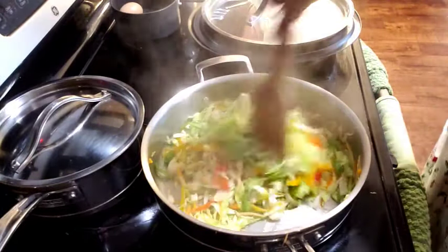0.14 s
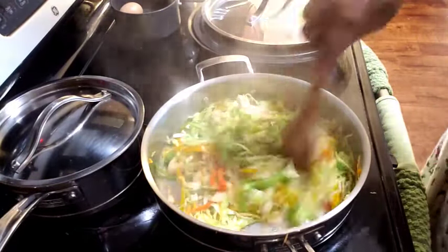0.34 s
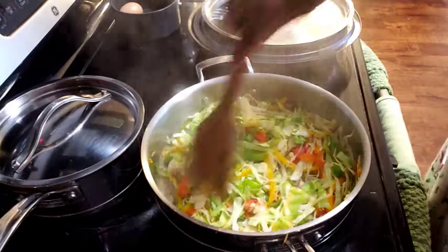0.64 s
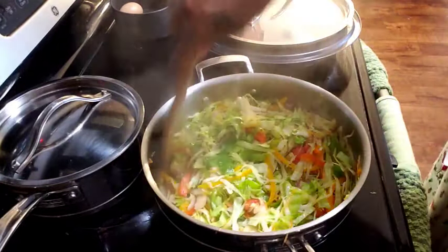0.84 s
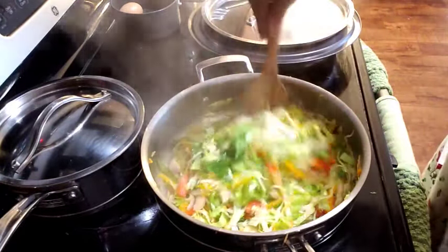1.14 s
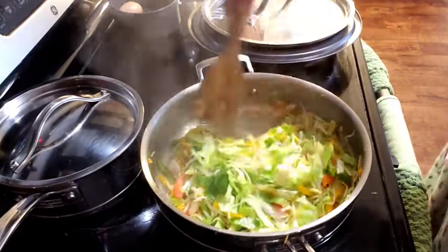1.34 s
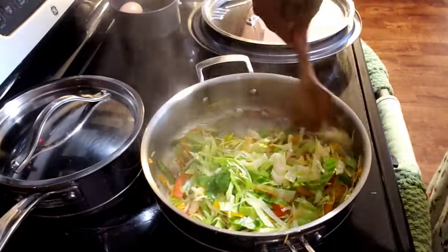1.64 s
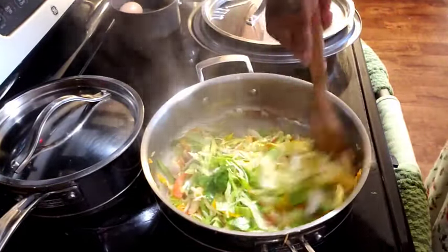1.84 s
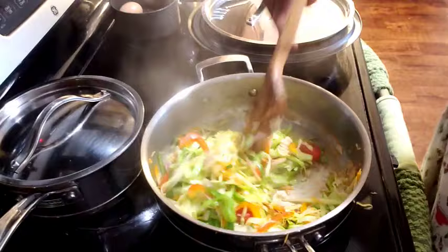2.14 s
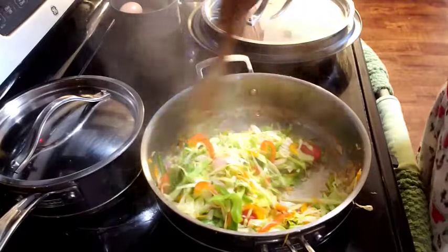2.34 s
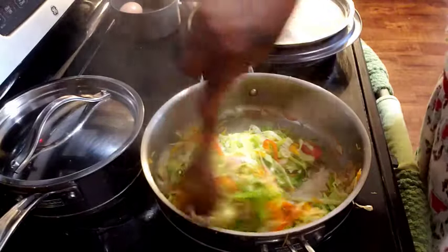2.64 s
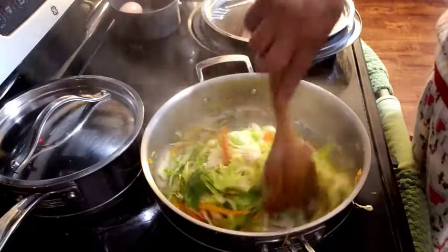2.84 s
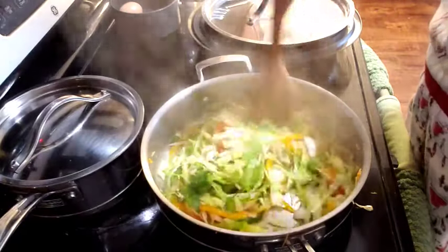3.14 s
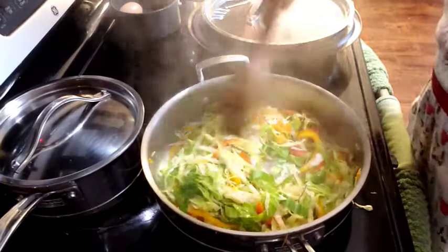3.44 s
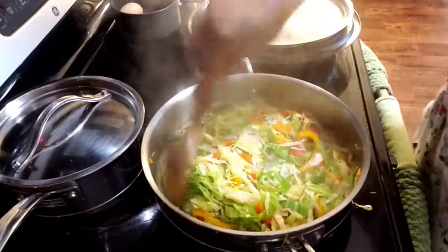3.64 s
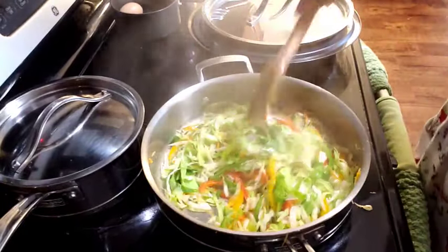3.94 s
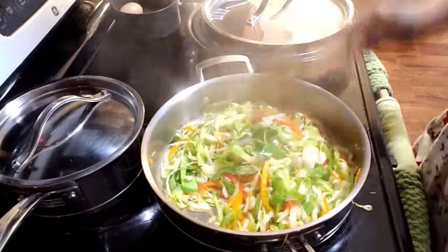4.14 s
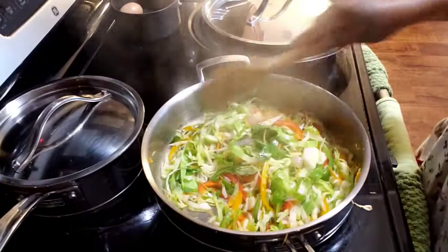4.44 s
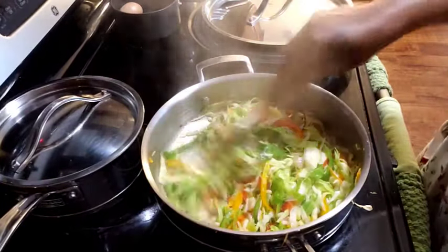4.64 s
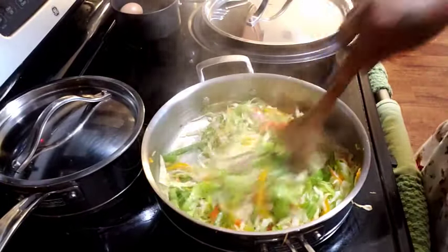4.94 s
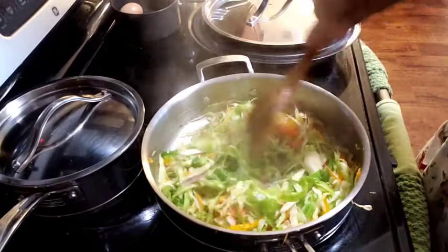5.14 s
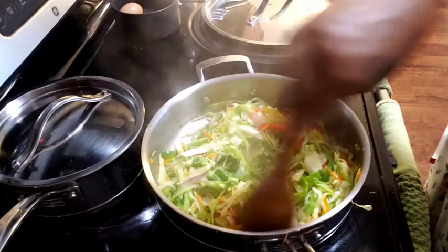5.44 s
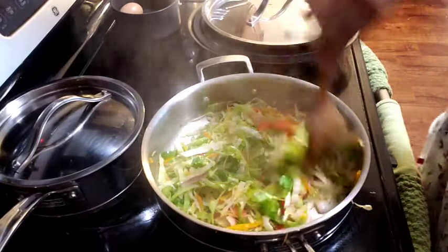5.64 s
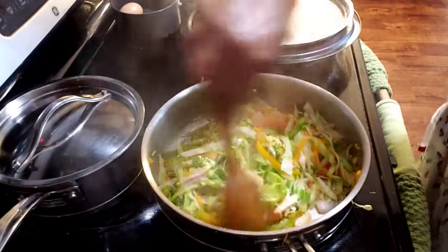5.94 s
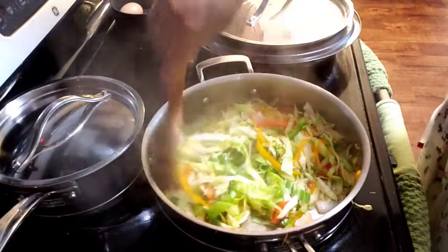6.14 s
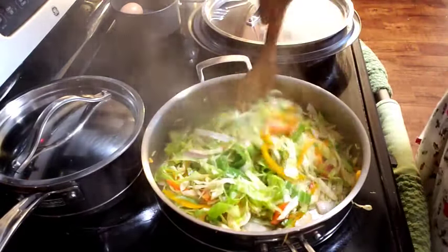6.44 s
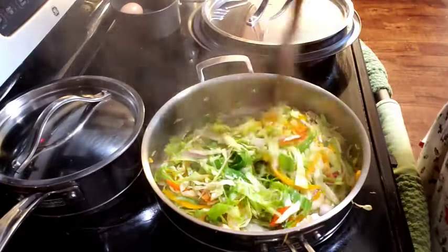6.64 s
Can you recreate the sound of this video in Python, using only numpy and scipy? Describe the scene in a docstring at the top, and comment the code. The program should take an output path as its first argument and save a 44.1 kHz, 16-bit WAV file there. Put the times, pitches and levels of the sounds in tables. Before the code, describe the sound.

Shredded vegetables sizzle softly in a steel pan while a kitchen hood fan rushes and hums steadily for about seven seconds. A wooden spoon stirs throughout, each stroke raising a moist rustle and a swell of hiss, with occasional little spits. A short scrape and dull bumps of the pan on the cooktop come at about 0.4 seconds. The spoon knocks the pan at 0.8 and 1 second, then harder at 1.5, each blow ringing briefly in the room. Soft bumps follow around 2.5 and 3.3 seconds, and a light knock at 3.7. The loudest sound is a hard, ringing rap on the rim at 4.3 seconds, followed by a duller thud at 4.6; the overall level dips slightly after the rap. Another short scrape comes at 5 seconds, then knocks at 5.5 and 5.9 and two lighter ones around 6.3, as the stirring and sizzling continue.

```python
"""Stir-frying under a hood fan

A wooden spoon stirs shredded vegetables in a steel pan on a glass cooktop while the fan rushes and hums. Steam
sizzles, shreds rustle, and the spoon scrapes and knocks the wall and raps hard on the rim; pan, spoon, cooktop
and kitchen ring. An automatic gain ducks at the loudest blow and creeps back."""
import sys
import numpy as np
from scipy import signal
from scipy.fft import rfft, irfft
from scipy.io import wavfile
from scipy.ndimage import uniform_filter1d

SR = 44100
rng = np.random.default_rng(int(sys.argv[2]) if len(sys.argv) > 2 else 0)


def dump(signal):
    """Clip the signal to [-1, 1] and save it as 16-bit WAV at the path in sys.argv[1]."""
    limited = np.clip(np.atleast_2d(signal).T, -1, 1)
    pcm = np.round(limited * 32767).astype(np.int16)
    wavfile.write(sys.argv[1], SR, pcm)


N = 299241

# how alike left and right are: frequency_hz, likeness (0-1)
STEREO_LIKENESS = [(130, 1), (300, 0.97), (640, .6), (1400, 0), (3000, 0)]
# tone of the pan's clusters of short-lived modes: frequency_hz, level_db
MODE_CLUSTERS = [(450, -1.5), (600, 0), (730, -5), (850, 3), (1000, -3), (1480, 1), (1750, 1.5),
                 (2000, 0.5), (2280, 1), (2600, 6), (3900, -2), (5700, -3), (8500, -4.5), (15000, -6)]


def undb(db):
    """Decibels to gain."""
    return 10 ** (np.asarray(db) / 20)


def lookup(table, hz):
    """Read (hz, value) points on a log-frequency axis."""
    points, values = np.transpose(table)
    return np.interp(np.log(np.maximum(hz, 1)), np.log(points), values)


def bins(x):
    """Frequencies of the spectrum of x."""
    return np.fft.rfftfreq(x.shape[-1], 1 / SR)


def colour(x, spectrum):
    """Equalise x by (hz, db) points."""
    return irfft(rfft(x) * undb(lookup(spectrum, bins(x))), x.shape[-1])


def cut(x, hz, kind, order):
    """Causal low- or high-pass."""
    return signal.sosfilt(signal.butter(order, min(hz, SR / 2 - 1000), kind, fs=SR, output="sos"), x)


def unit(x):
    """Scale to rms 1."""
    return x / np.sqrt(np.mean(x ** 2))


def add(out, start_s, sound):
    """Mix a sound in at its time."""
    start = int(start_s * SR)
    out[:, start:start + sound.shape[1]] += sound


def wander(rate_hz):
    """Smooth random drift of rms 1."""
    hold = int(SR / rate_hz)
    steps = np.repeat(rng.standard_normal(N // hold + 1), hold)
    return unit(uniform_filter1d(steps, hold)[:N])


def decay(t, t60_s):
    """Exponential decay of unit energy."""
    shape = np.exp(-np.log(1000) * t / t60_s)
    return shape / np.sqrt(np.sum(shape ** 2))


def swell(middle_s, half_s):
    """Bell-shaped rise and fall around a moment."""
    return np.exp(-((np.arange(N) / SR - middle_s) / half_s) ** 2)


def diffuse(size):
    """Stereo white noise: alike in the bass, unrelated in the treble."""
    noise = rng.standard_normal((2, size))
    mid, side = rfft(noise)
    likeness = np.clip(lookup(STEREO_LIKENESS, bins(noise)), 0, 1)
    mid, side = mid * np.sqrt((1 + likeness) / 2), side * np.sqrt((1 - likeness) / 2)
    return irfft(np.array([mid + side, mid - side]), size)


def crackle(per_s, spread_db):
    """Tiny random clicks, a few much larger than the rest."""
    sizes = undb(spread_db * np.minimum(rng.exponential(size=(2, N)), 5))
    clicks = rng.random((2, N)) < per_s / SR
    return unit(clicks * sizes * rng.choice([-1, 1], (2, N)))


def ring(t, modes):
    """Struck (pitch_hz, resonance_db, t60_s) modes; the high ones reach left and right out of step."""
    out = np.zeros((2, len(t)))
    for k, (hz, db, t60_s) in enumerate(modes):
        skew = (-1) ** k * np.arccos(np.clip(lookup(STEREO_LIKENESS, hz), 0, 1)) / 2
        damping = np.log(1000) / t60_s
        polarity = (-1) ** (k // 2)  # some modes start towards the listener, others away
        tone = np.cos(2 * np.pi * hz * t + np.array([[skew], [-skew]]))
        out += polarity * undb(db) * 2 * damping / SR * np.exp(-damping * t) * tone
    return out


def hood_fan(air_db=-54.5):
    """The fan's rush of air over its slightly wavering motor hum."""
    # tone of the moving air: frequency_hz, level_db
    air_spectrum = [(25, -36), (42, -13.5), (55, 0.5), (72, -8), (110, -4), (170, 2.5), (300, -2.5),
                    (500, -2), (620, -15), (850, -12), (1200, -25), (4000, -31.5)]
    # motor partials: pitch_hz, level_db
    partials = [(42, -60.5), (119, -57.5), (377, -75)]
    t = np.arange(N) / SR
    hum = sum(undb(db) * np.sin(2 * np.pi * hz * t + 0.36 * wander(3.5)) for hz, db in partials)
    return undb(air_db) * unit(colour(diffuse(N), air_spectrum)) + hum


def frying_food(simmer_db=-61.3, heating_db_per_s=.98, settling_db=-64.5, pops_db=-6,
                sizzle_trim_db=9, rustle_trim_db=-1, spit_half_s=.02):
    """Steam bubbles burst on hot steel; pushed shreds rub and snap. Both swell with each stroke."""
    # tone of the bursting bubbles: frequency_hz, level_db
    sizzle_spectrum = [(600, -2.5), (1300, -11), (1650, -7.5), (2500, -9), (4300, -5), (8000, -2),
                       (15000, 4.5)]
    # tone of the rubbing shreds: frequency_hz, level_db
    rustle_spectrum = [(300, 7.5), (850, -1), (1200, -1.5), (1600, 2.5), (2500, -0.5), (4500, -1),
                       (8000, -24), (15000, -11.5)]
    # spoon strokes through the food, before trim: middle_s, half_length_s, rustle_db, sizzle_db
    strokes = [(0.42, .4, -55, -58.5), (1.08, .18, -52.5, -52), (1.85, .3, -56, -63),
               (2.62, .25, -56.5, -58), (3.01, .11, -52, -66), (3.28, .05, -50, -55.5),
               (3.96, .2, -56, -60.5), (4.95, .22, -54.5, -67), (5.65, .2, -59.5, -57.5),
               (6.62, .3, -51.5, -54.5)]
    # wet shreds spit when squeezed onto the steel, before trim: middle_s, level_db
    spits = [(.425, -53.5), (.868, -46), (2.57, -57), (3.706, -47.5), (4.65, -55)]
    simmer = undb(simmer_db + heating_db_per_s * np.arange(N) / SR)
    stir_power = sum(undb(db) ** 2 * swell(s, half_s) for s, half_s, _, db in strokes)
    spit_power = sum(undb(db) ** 2 * swell(s, spit_half_s) for s, db in spits)
    rub_power = sum(undb(db) ** 2 * swell(s, half_s) for s, half_s, db, _ in strokes)
    steam = np.sqrt(simmer ** 2 + stir_power + spit_power)
    motion = np.sqrt(undb(settling_db) ** 2 + rub_power)
    sizzle = unit(colour(diffuse(N) + undb(pops_db) * crackle(per_s=720, spread_db=4), sizzle_spectrum))
    rustle = unit(colour(diffuse(N) + crackle(per_s=2000, spread_db=1), rustle_spectrum))
    waver_db, flutter_db = .5 * wander(40), .8 * wander(60)
    return (sizzle * steam * undb(sizzle_trim_db + waver_db)
            + rustle * motion * undb(rustle_trim_db + flutter_db))


def spoon_scrapes(squeak_hz=860, upper_hz=2300):
    """Dense slips of wood on steel ring two damped resonances, swelling and fading with each drag."""
    # drags over the pan wall: middle_s, half_length_s, level_db
    drags = [(0.422, 0.037, -55), (5.039, 0.049, -53.5)]
    t = np.arange(SR // 4) / SR
    body = ring(t, [(squeak_hz, 0, .031), (upper_hz, -5, .02)])
    slips = unit(signal.fftconvolve(crackle(per_s=1000, spread_db=2), body, axes=1)[:, :N])
    return slips * sum(undb(db) * swell(s, half_s) for s, half_s, db in drags)


def kitchen_reverb(t, build_s=0.0022):
    """Pan-coloured room tail of unit energy that builds quickly and dies sooner in the treble."""
    # the kitchen's decay times: frequency_hz, t60_s
    decay_times = [(250, 0.84), (1000, 0.62), (4000, 0.62), (14000, 0.58)]
    hz, s, grid = signal.stft(colour(diffuse(len(t)), MODE_CLUSTERS), SR, nperseg=256)
    absorption = np.exp(-np.log(1000) * s / lookup(decay_times, hz)[:, None])
    tail = signal.istft(grid * absorption, SR)[1][:, :len(t)]
    onset = 1 - np.exp(-(t / build_s) ** 2)
    return unit(tail * onset) / np.sqrt(len(t))


def pan_rings(t, split_hz=450):
    """The steel floor rings low, the wall high; each as a pair: struck at the floor, struck at the rim."""
    # pan modes: pitch_hz, t60_s, floor_hit_db, rim_hit_db
    modes = [(213.5, .25, 3.5, 4.5), (258.2, 0.24, -17, 7), (299.5, 0.19, -13.5, -4),
             (345, 0.11, -4, -15.5), (380, .25, -5, -3.5), (504.6, 0.7, 10, 3), (527, .5, 12, 3.5),
             (574, 0.55, 8.5, -3), (657.6, 0.23, 5, 7.5), (870, 0.4, -10, 1.5), (922, 0.3, 5, -1),
             (915, 0.64, 0, -8), (1120, 0.56, 3.5, 6), (1358, .3, -4, 8), (1491, 0.512, 8, 7),
             (1525, .85, 2, 17), (1844, 0.23, 7.5, -2.5), (2023, .38, 5, 4), (2450, 0.38, 11, 6.5),
             (2530, 0.68, 7.5, 17), (2700, .42, -6.5, -3), (3230, 0.37, 5.5, 6), (4800, .55, -2, -3),
             (5520, .5, 3.5, -6)]
    floor_modes = [mode for mode in modes if mode[0] < split_hz]
    wall_modes = [mode for mode in modes if mode[0] >= split_hz]
    return [(ring(t, [(hz, db, t60_s) for hz, t60_s, db, _ in part]),
             ring(t, [(hz, db, t60_s) for hz, t60_s, _, db in part]))
            for part in (floor_modes, wall_modes)]


def pan_clatter(t, crack_db=-7, body_db=-4):
    """The contact's crack and the pan's crowd of short-lived modes, new at every blow."""
    envelope = undb(crack_db) * decay(t, t60_s=.012) + undb(body_db) * decay(t, t60_s=.11)
    return colour(diffuse(len(t)), MODE_CLUSTERS) * envelope


def pan_strike(t, bodies, cooktop_db, height, floor_db, wall_db, lower_hz, upper_hz, clack_db,
               room_db=-9.5, clack_room_db=-12, clack_t60_s=.08, snap_db=-10, bloom_s=.0045):
    """Bright and deep ringing of the pan after one contact."""
    room, cooktop, floor, wall = bodies
    # the height of the blow decides which modes wake
    floor_ring, wall_ring = ((1 - height) * low + height * rim for low, rim in (floor, wall))
    # spoon and pan in contact have two quickly damped resonances, set by grip and place
    clack = undb(clack_db) * ring(t, [(lower_hz, 0, clack_t60_s), (upper_hz, -1, clack_t60_s)])
    clack += undb(clack_room_db) * signal.fftconvolve(clack, room, axes=1)[:, :len(t)]
    snap = undb(snap_db) * cut(1. * (t == 0), 6000, "low", order=2)
    splash = cut(snap + pan_clatter(t) + undb(room_db) * room, 280, "high", order=2)
    bright = splash + undb(wall_db) * wall_ring + clack
    # the heavy pan floor and the glass under it take a moment to get going
    bloom = 1 - np.exp(-t / bloom_s)
    deep = (undb(cooktop_db) * cooktop + undb(floor_db) * floor_ring) * bloom
    return bright, deep


def spoon_knocks(low_cut_hz=58):
    """A blow is a soft push, cushioned by food, plus a tick of bare wood on steel; a bump only pushes."""
    # spoon blows: start_s, push_db, contact_cutoff_hz, tick_db, height (0 floor, 1 rim), cooktop_db,
    # floor_db, wall_db, lower_clack_hz, upper_clack_hz, clack_db, rebound_after_s (0 for none)
    blows = [ (.826, 5.5, 6800, 9, .76, 3, 14, -4, 605, 1340, 8, 0),
             (1.028, 10.5, 1850, -12, .39, 10, 10, -8, 833, 1700, 2, .012),
             (1.505, 12, 2200, 8, .09, 1, 17, 6, 876, 2020, 16.5, 0),
             (1.506, 1.5, 1600, -19, .56, -6, 10, -2, 606, 1480, 20.5, 0),
             (3.685, -.5, 810, -10, .3, -4, 11, 1, 640, 3020, 9, 0),
             (4.261, 26.5, 1850, 12, .8, 17.5, 15, 4, 500, 1500, 2, 0),
             (4.2693, 19.5, 2900, 15, .23, 18, 18, 1.5, 296, 689, 15.5, 0),
             (4.592, 15, 1436, -4, 0, 14, 0, -15, 160, 400, 12, 0),
             (5.4556, 1, 3900, -6, .7, -8, 16, -13, 595, 2020, 17, .0107),
             (5.908, 7, 7560, 9, 0, -1, 23.5, 4, 345, 2474, 13, 0),
             (6.295, -6, 1710, -17.5, .5, 14, 2, 3, 780, 1562, 6, 0),
             (6.388, 7.7, 1780, -11, .95, -14, 4, -6, 866, 1500, 5.5, .015), ]
    # the shoved pan bumps on the cooktop: start_s, push_db, contact_cutoff_hz, cooktop_db
    bumps = [(.393, -11, 1120, 23.5), (.428, -4.5, 1020, 22), (.866, -2, 900, 17), (.963, -3, 885, 16),
             (1.120, 6.5, 514, 15), (1.600, -5, 400, 20), (2.551, -4.5, 480, 22), (3.277, -17, 448, 30)]
    # voicing of every bump: height (0-1), floor_db, wall_db, lower_clack_hz, upper_clack_hz, clack_db
    bump_voicing = (.5, 9, -1, 420, 655, 5)
    # modes of the glass cooktop: pitch_hz, level_db, t60_s
    cooktop_modes = [(87, -0.5, 0.087), (118.7, 1.5, 0.25), (153.6, -2.5, 0.31)]
    out, t = np.zeros((2, N + SR)), np.arange(2 ** 15) / SR
    bodies = kitchen_reverb(t), ring(t, cooktop_modes), *pan_rings(t)
    for start_s, push_db, cutoff_hz, tick_db, height, cooktop_db, *voicing, rebound_s in blows:
        contacts = [(start_s, push_db, cutoff_hz, tick_db)]
        if rebound_s > 0:  # same spot again: a weaker, duller push with about as much tick
            contacts.append((start_s + rebound_s, push_db - 8, cutoff_hz * .85, tick_db + .5))
        for at_s, soft_db, hz, hard_db in contacts:
            bright, deep = pan_strike(t, bodies, cooktop_db, height, *voicing)
            push = undb(soft_db) * cut(bright + deep, hz, "low", order=8)
            tick = undb(hard_db) * cut(bright, hz, "high", order=2)
            add(out, at_s, push + tick)
    for start_s, push_db, cutoff_hz, cooktop_db in bumps:
        bright, deep = pan_strike(t, bodies, cooktop_db, *bump_voicing)
        add(out, start_s, undb(push_db) * cut(bright + deep, cutoff_hz, "low", order=8))
    return cut(out[:, :N], low_cut_hz, "high", order=3)


def scene(balance_db=2.0):
    """Pan and fan, sitting a little to the left."""
    balance = undb(np.array([[balance_db], [-balance_db]]) / 2)
    return (spoon_knocks() + spoon_scrapes() + frying_food() + hood_fan()) * balance


def gain_control(x, limit_db=-13.4, recover_db_per_s=0.39, window_s=0.04):
    """The gain falls at once when the level passes the limit and recovers slowly."""
    power = uniform_filter1d(np.mean(x ** 2, axis=0), int(window_s * SR))
    over_db = np.maximum(10 * np.log10(np.maximum(power, 1e-12)) - limit_db, 0)
    recovered_db = recover_db_per_s * np.arange(N) / SR
    return x * undb(recovered_db - np.maximum.accumulate(over_db + recovered_db))


def record(dry, top_hz=15750):
    """Microphone colour, gain control, clipping at full scale and a steep high cut."""
    # microphone response: frequency_hz, gain_db
    microphone = [(30, 4.5), (5800, 0), (6600, -1.5), (7500, 0.5), (8700, -7), (15000, -12)]
    sound = np.clip(gain_control(colour(dry, microphone)), -1, 1)
    return signal.sosfilt(signal.ellip(10, .2, 70, top_hz, fs=SR, output="sos"), sound)


dry = scene()
out = record(dry)
dump(out)
```